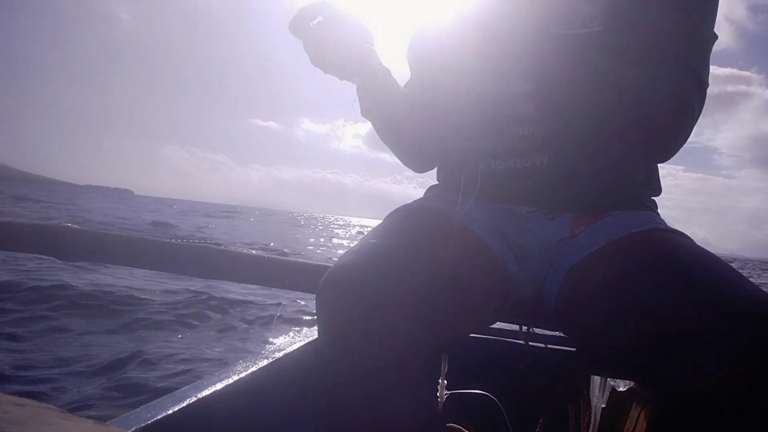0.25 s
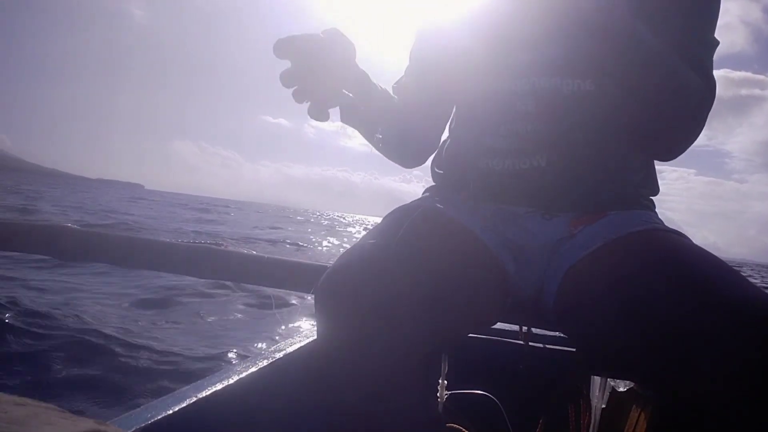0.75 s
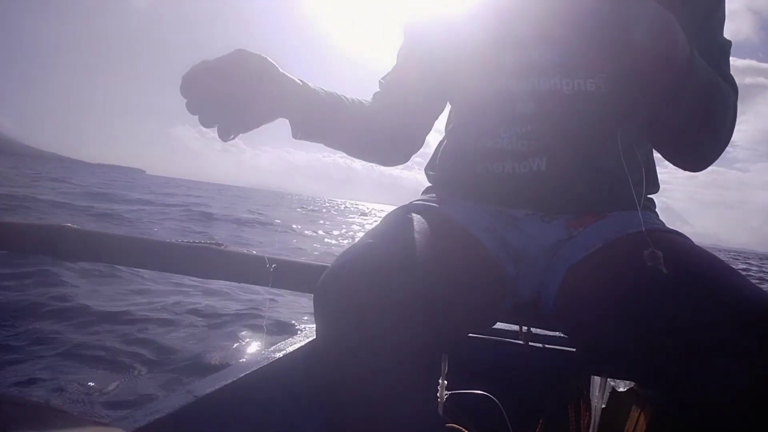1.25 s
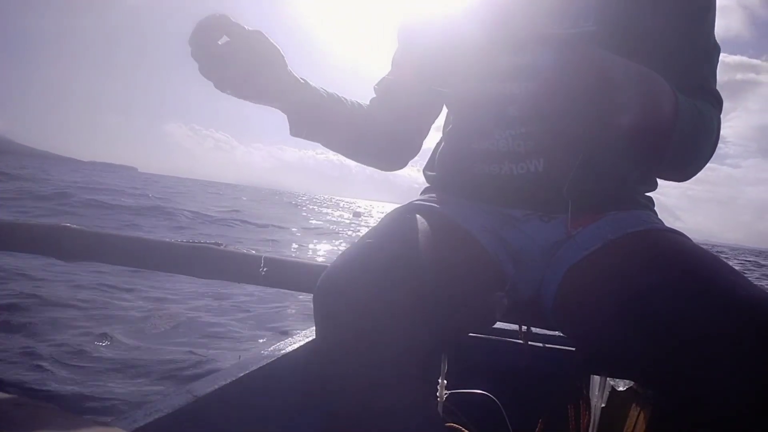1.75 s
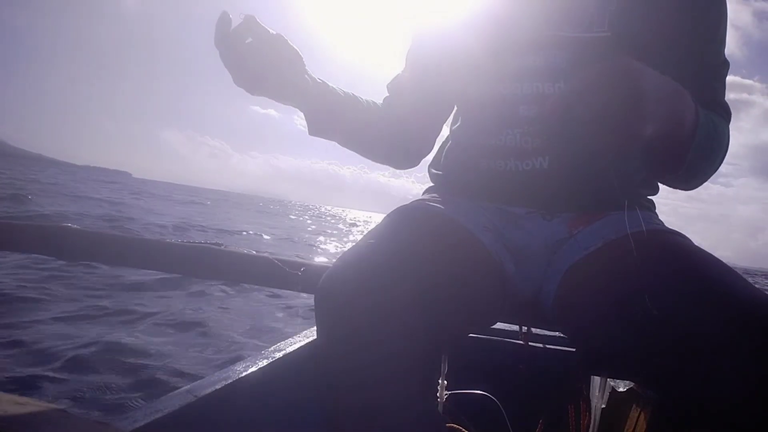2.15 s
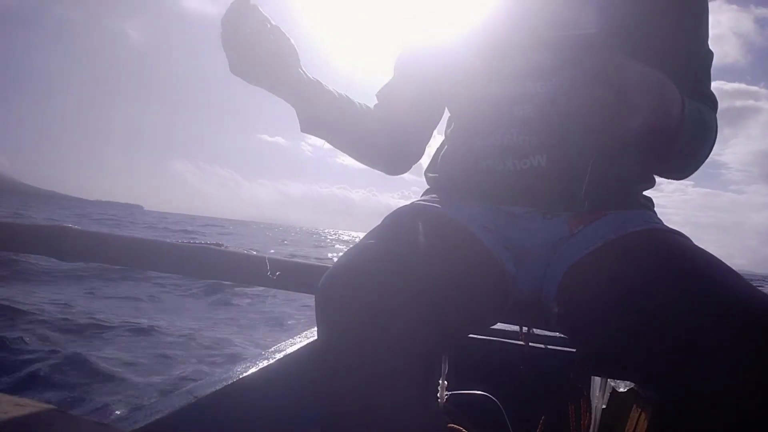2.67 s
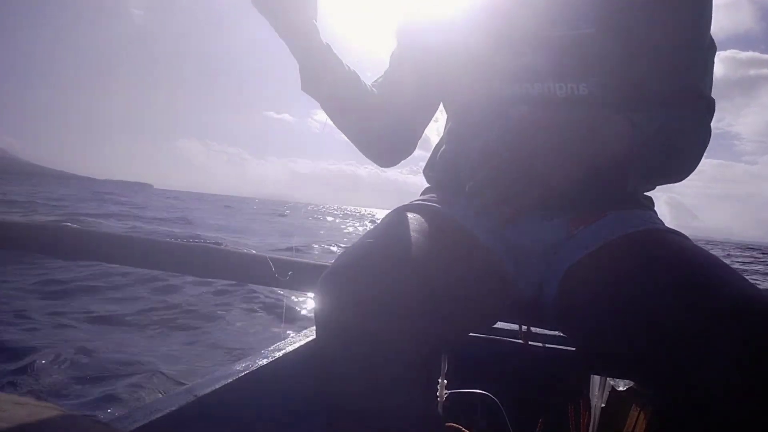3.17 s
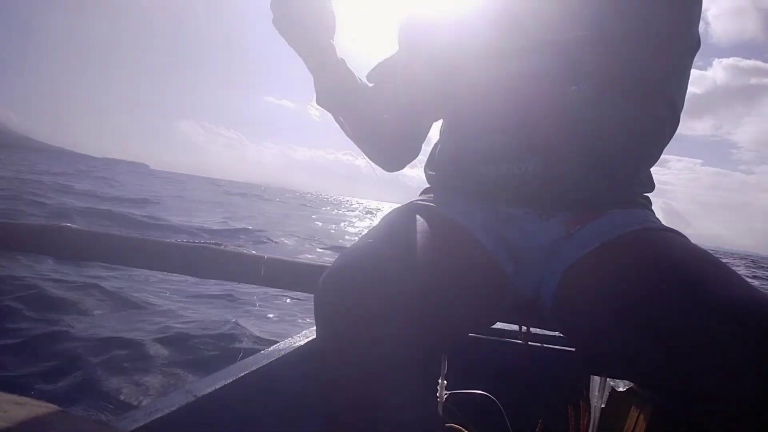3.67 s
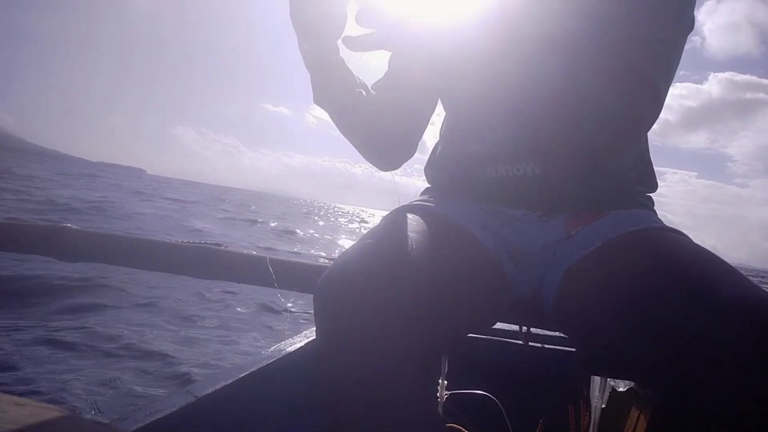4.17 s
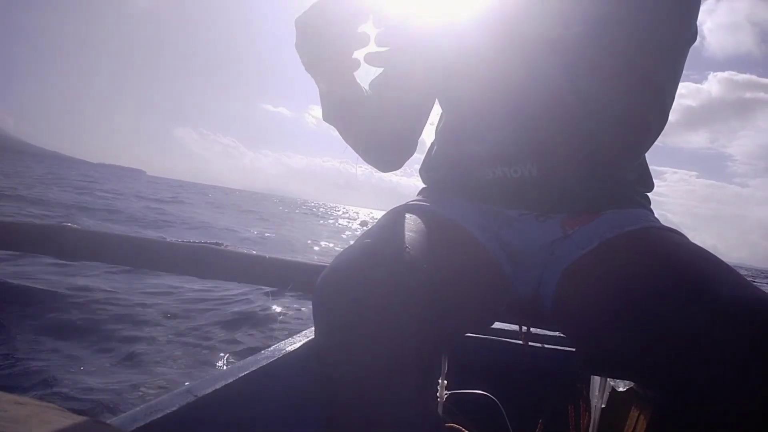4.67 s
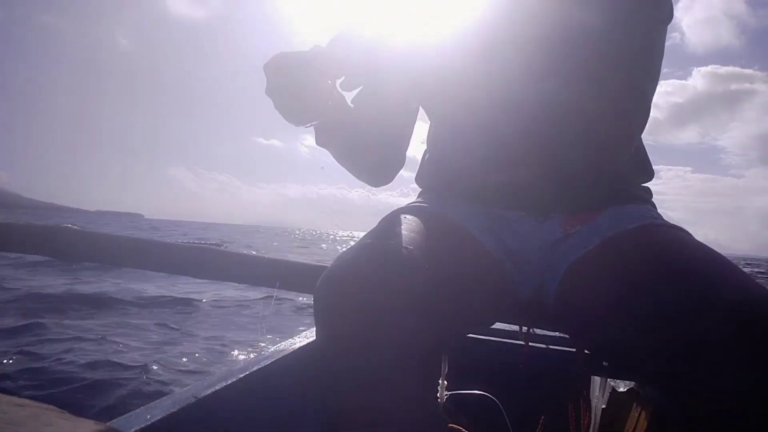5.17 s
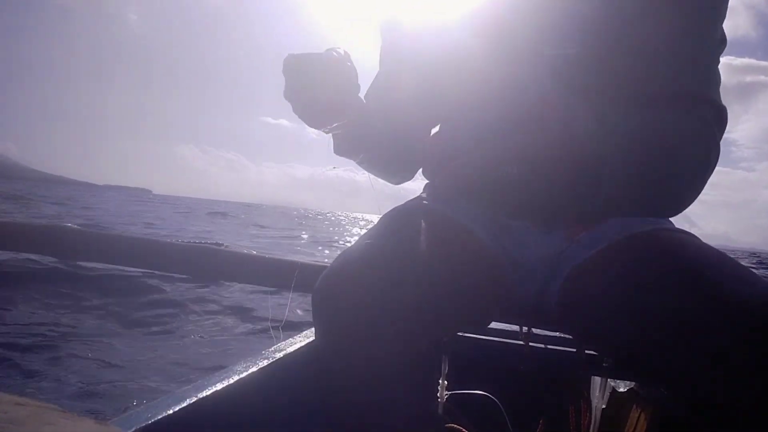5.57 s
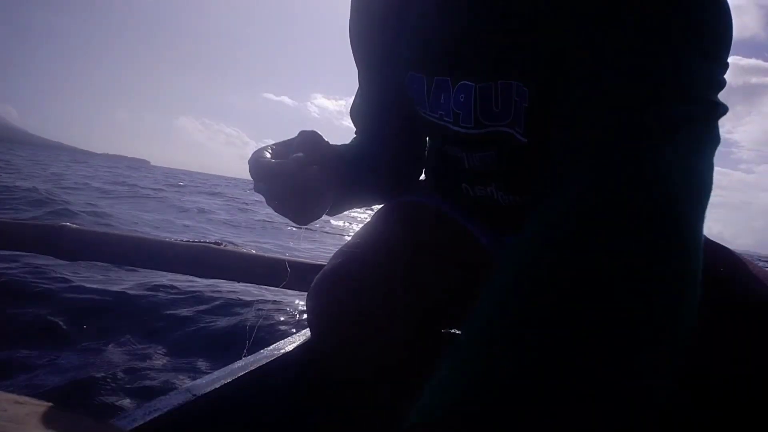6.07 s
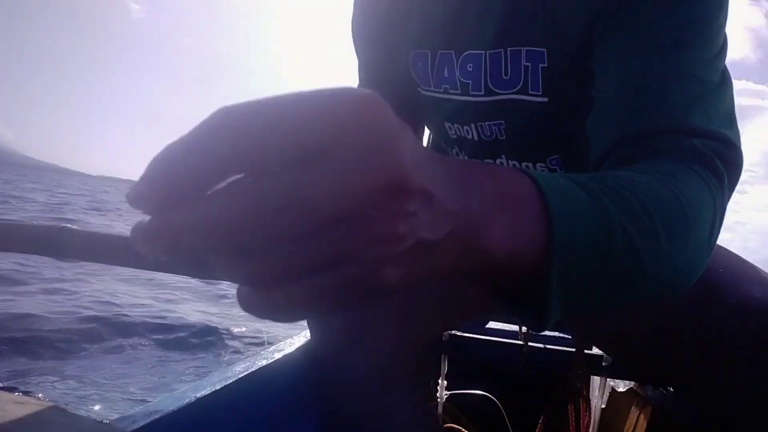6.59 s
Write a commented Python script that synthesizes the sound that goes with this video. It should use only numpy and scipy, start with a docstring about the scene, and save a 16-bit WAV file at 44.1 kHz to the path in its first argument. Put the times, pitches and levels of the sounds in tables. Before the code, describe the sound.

Small waves lap close by against the wooden hull of an open boat, with short ringing bubbles, gurgles, fizzing foam and crisp ticks of spray. A faint, nearly steady wash of distant sea lies underneath. Wind rumbles and thumps on the microphone right at the start and again around 0.7 to 1.1 seconds, with a light splash at about 0.6. After a smaller gust near 2 seconds, the water gurgles more fully, and droplets spatter from 2.5 to 3.3 seconds, the sharpest just before 3. The strongest low buffet comes at about 3.4 seconds. Things ease around 4 seconds, with a small gulp near 4.4. Bubbly splashing returns around 4.9 and 5.5 seconds, while uneven gusts rumble from 5.1 to 6.3. The wind then drops, and one more lap spatters the hull from 6.6 seconds to the end, just before 7.

```python
"""Waves lapping at an open boat.

Small waves at sea trap bubbles that ring briefly, leave foam bursting on the planks and throw droplets
that tick on the hull. Gusts rumble across a small microphone, whose ports ring in the treble.
The far sea is a faint, near-steady noise."""
import sys
import numpy as np
from scipy import signal
from scipy.fft import rfft, irfft, next_fast_len
from scipy.io import wavfile
from scipy.ndimage import uniform_filter1d

SR = 44100
rng = np.random.default_rng(int(sys.argv[2]) if len(sys.argv) > 2 else 0)


def file_out(sig):
    """Save sig as 16-bit WAV at sys.argv[1]."""
    # one column per channel
    cols = np.atleast_2d(sig).T
    # limit, then scale
    lim = np.clip(cols, -1, 1)
    pcm = np.round(lim * 32767).astype(np.int16)
    wavfile.write(sys.argv[1], SR, pcm)


N = 301203

# lap envelopes: t/s, gurgle level/dB, froth level/dB, spray level/dB
LAPS = [(0.0, -61, -63, -61.5), (0.27, -68, -69, -71), (0.49, -71.5, -71, -66.5), (0.89, -71.5, -72, -71.5),
        (1.08, -65, -65, -65), (1.18, -63.5, -65.5, -64.5), (1.31, -67, -74.5, -71), (1.54, -87, -74, -74),
        (1.69, -68.5, -70.5, -70), (1.94, -76, -68, -72.5), (2.19, -56.5, -66.5, -66.5),
        (2.34, -50, -60, -59.5), (2.49, -62, -60, -60.5), (2.7, -73, -70, -64.5), (2.91, -77, -69.5, -63.5),
        (3.06, -57.5, -67.5, -57), (3.23, -80, -69.5, -63), (3.44, -69, -69, -67.5),
        (3.58, -60.5, -66, -66.5), (3.82, -68, -72, -71), (4.28, -64, -66, -67.5),
        (4.73, -66.5, -68.5, -72.5), (4.89, -68, -67, -71), (5.0, -54.5, -64.5, -63),
        (5.19, -65.5, -69, -71.5), (5.44, -68, -70, -68.5), (5.59, -63.5, -68.5, -64.5),
        (5.84, -68.5, -70, -70), (6.11, -61, -67, -72.5), (6.31, -60.5, -65, -69), (6.6, -57.5, -62, -65),
        (6.83, -56, -60, -60)]
# loud bubbles: t/s, level/dB, f/Hz
LOUD_BUBBLES = [(.005, -52.5, 877), (.133, -52, 3450), (.16, -52.5, 2790), (.162, -53.5, 956),
                (.179, -45, 1970), (.237, -51.5, 2790), (.242, -53.5, 2040), (.472, -55.5, 3270),
                (.612, -46, 3920), (.616, -43.5, 1500), (.624, -41.5, 1168), (.625, -43.5, 2800),
                (.856, -49.5, 3420), (.937, -51.5, 2210), (1.056, -51, 2090), (1.076, -52, 890),
                (1.081, -47.5, 2120), (1.201, -48.5, 1676), (1.266, -55, 824), (1.286, -48.5, 2350),
                (1.287, -51.5, 3960), (1.336, -53, 1610), (1.504, -50.5, 1320), (1.54, -51.5, 1860),
                (1.833, -56, 2070), (1.891, -52, 2000), (1.96, -51, 2340), (1.961, -45, 1253),
                (2.139, -51.5, 1420), (2.193, -45.5, 1044), (2.194, -48, 747), (2.215, -46, 2640),
                (2.224, -46.5, 1270), (2.228, -44.5, 780), (2.25, -41.5, 3500), (2.252, -43, 716),
                (2.276, -49, 2720), (2.28, -51, 1142), (2.285, -47, 1610), (2.303, -53, 1653),
                (2.344, -51, 1620), (2.446, -52, 2420), (2.485, -51, 740), (2.552, -49, 4500),
                (2.603, -52, 2450), (2.646, -51.5, 3110), (2.651, -51, 2330), (2.711, -51, 1040),
                (2.869, -44, 2880), (2.873, -41, 1650), (2.901, -51, 1170), (2.927, -51.5, 693),
                (2.929, -41, 2670), (2.931, -51, 1710), (2.953, -53, 1334), (2.976, -46, 2920),
                (3.006, -51, 3160), (3.079, -50.5, 1790), (3.118, -41, 1730), (3.119, -48, 1170),
                (3.123, -47.5, 3320), (3.195, -50.5, 1590), (3.468, -46.5, 2440), (3.498, -47.5, 1940),
                (3.554, -43.5, 2240), (3.633, -47.5, 1570), (3.648, -51, 3940), (3.649, -43, 742),
                (3.674, -46.5, 1530), (3.676, -44, 895), (4.04, -57, 1900), (4.089, -55, 1990),
                (4.105, -48, 2480), (4.131, -55, 3000), (4.425, -48.5, 2060), (4.444, -47, 2990),
                (4.483, -50, 1730), (4.491, -50.5, 1077), (4.776, -51.5, 1010), (4.827, -47, 2100),
                (4.862, -39, 3480), (4.863, -43, 2300), (4.876, -43, 1007), (4.921, -47, 766),
                (4.923, -44.5, 986), (5.043, -40, 1190), (5.05, -45.5, 1690), (5.088, -42, 2170),
                (5.105, -41, 1504), (5.21, -53.5, 1970), (5.33, -60, 1500), (5.427, -41.5, 1650),
                (5.454, -45.5, 3000), (5.491, -40.5, 1920), (5.492, -47, 695), (5.492, -39, 2600),
                (5.493, -46, 1080), (5.504, -46, 734), (5.625, -51, 2670), (5.683, -49.5, 2980),
                (5.746, -44.5, 1915), (5.976, -53, 2360), (6.133, -48, 1070), (6.135, -41.5, 639),
                (6.137, -51, 820), (6.396, -50, 2310), (6.439, -47, 1530), (6.476, -47.5, 830),
                (6.586, -46, 3610), (6.591, -43, 896), (6.611, -43, 1430), (6.696, -45, 1150),
                (6.733, -50, 2600)]
# closing or opening cavities: t/s, length/s, start f/Hz, end f/Hz, level/dB
CAVITIES = [(4.382, .052, 290, 1000, -53), (4.312, .028, 850, 1550, -60), (.152, .025, 3200, 1900, -48)]
# loud droplets: t/s, level/dB, middle band re top band/dB, crack re level/dB
LOUD_DROPLETS = [(.0327, -45, -4, -21), (.0456, -39, -17, -12), (.139, -33, -4, -10), (.1544, -39, -19, -8),
                 (.1716, -32, -9, -10), (.1924, -39.5, 8, 3), (.2095, -32.5, -0.5, 0),
                 (.4716, -34, -11, -35), (.499, -35, -9, -20), (.608, -36, -5, -25), (.6172, -27, -7, -17),
                 (.6254, -42, -10, 7), (.8574, -33, -9, -23), (.9505, -37, -21, 3), (1.0115, -40, 0, 8),
                 (1.079, -34.5, 25, 1), (1.1253, -28, -21, -29), (1.2155, -40, -28, -27),
                 (1.2971, -38, 22, -2), (1.4615, -40.5, 0, -8), (1.5937, -39, -5, 0),
                 (1.6376, -28, -12.5, -6.5), (1.8084, -51, -9, -8), (1.8413, -39, -5.5, -17),
                 (1.9559, -49, 5, 10), (2.0003, -37, -16, -12), (2.2941, -33, -8, -12),
                 (2.3336, -36.5, 17, -0.5), (2.4661, -38.5, 0, -1), (2.4785, -36, -17, -11),
                 (2.5639, -27, -22, -23), (2.631, -27.5, -3, -1), (2.6411, -24, -7, -5.5),
                 (2.652, -38, 9, -9), (2.661, -33, -14, -14), (2.7189, -34, -10, 1),
                 (2.8702, -23.5, -6, -6), (2.9027, -26.5, -8.5, -9.5), (2.926, -50, -10, 2),
                 (2.9338, -12, -23, -13.5), (2.975, -29.5, -12, -3), (2.981, -34, 12, -7),
                 (3.0072, -36, -5, -3), (3.059, -27, -21, -4), (3.076, -40, 2, -23), (3.08, -31.5, 0, 5.5),
                 (3.0896, -31, 18, 11.5), (3.1093, -30.5, -2.5, -10), (3.1196, -29, -5, -10),
                 (3.1352, -34, -10, -9), (3.1616, -40, 5, -28), (3.2042, -37, -2, -23),
                 (3.2645, -26.5, -9.5, -9), (3.3533, -38, -7, -11), (3.457, -39, -21, 2),
                 (3.4621, -37, -3, -1), (3.4703, -34, 15, 2), (3.4917, -32.5, 1, -1),
                 (3.509, -21, -24, -11), (3.519, -39, 6, -20), (3.6621, -34, 1.5, 5.5), (3.696, -39, -2, 2),
                 (3.7142, -37, -2.5, -1), (4.0826, -47, -16, 10), (4.3353, -42.5, 7, -5),
                 (4.5431, -38, -25, -12), (4.8316, -41, -8, -15), (4.8537, -22, -14, -32),
                 (4.8686, -30, 12, -10), (4.878, -34, -8.5, -15), (4.905, -31, -10, -29),
                 (4.9182, -33, -7, -12), (4.9295, -31, -16, -20), (4.9667, -29.5, -9.5, -27),
                 (5.0537, -27.5, -29, -7), (5.0767, -37, -14, -4), (5.0877, -36, -11, -5),
                 (5.1037, -34, -6, -9), (5.1772, -36.5, -20, -17), (5.4306, -34.5, -0.5, 1.5),
                 (5.4556, -43, 8, 10), (5.4894, -29, -11, -31), (5.5468, -31.5, -3, -7),
                 (5.6639, -38.5, -5, 0), (5.759, -36.5, -2.5, 1.5), (5.77, -33.5, -9, -13),
                 (5.8083, -37, -6.5, -11), (6.2546, -53, -19, -15), (6.359, -40, -3.5, -22),
                 (6.6035, -37, -9, -3), (6.6109, -31, -5, -19), (6.6472, -24, -15, -9),
                 (6.705, -36, -16, -14.5), (6.751, -35.5, -27.5, -23), (6.758, -27.5, -6.5, -11),
                 (6.777, -34, -14.5, -17), (6.789, -22.5, -12, -13), (6.8203, -38.5, -1, -3)]
# wind rumble envelope: t/s, level/dB
GUST_LEVELS = [(0.0, -64), (0.07, -51), (0.13, -28), (0.32, -33.5), (0.36, -44), (0.55, -57), (0.74, -34),
               (0.78, -45), (0.86, -31), (0.91, -37), (0.97, -43.5), (1.1, -30.5), (1.16, -50),
               (1.75, -55.5), (1.86, -34), (1.96, -56), (2.02, -38.5), (2.19, -32), (2.43, -64),
               (2.53, -44.5), (2.97, -62), (3.01, -37.5), (3.16, -42.5), (3.46, -25.5), (3.5, -30.5),
               (3.69, -36), (3.75, -38), (3.8, -33.5), (3.99, -54), (4.45, -52), (4.51, -34), (4.57, -43),
               (4.75, -47), (4.77, -45.5), (4.94, -38.5), (5.0, -55), (5.12, -28), (5.16, -48),
               (5.21, -34.5), (5.31, -38), (5.34, -32), (5.5, -32.5), (5.52, -25.5), (5.55, -35),
               (5.69, -38), (5.73, -51), (5.78, -29), (5.82, -31), (5.84, -40), (6.16, -32), (6.22, -29.5),
               (6.39, -53), (6.62, -52), (6.83, -54)]
# single eddies: t/s, level/dB, f/Hz, flutter level/dB
EDDIES = [(0.127, -23.5, 121.4, -32), (0.218, -25.5, 75.4, -37.5), (0.238, -25.5, 200, -44),
          (0.248, -27, 113, -33.5), (0.307, -33, 72.5, -49), (0.718, -30, 78, -33), (0.795, -32, 74, -34.5),
          (0.85, -26.5, 152, -35), (1.03, -30, 74.6, -67), (1.089, -25.5, 116, -42), (2.105, -29, 77, -59),
          (3.283, -29.5, 75.6, -45), (3.35, -27, 108, -37.5), (3.403, -18, 77, -39),
          (3.439, -24.5, 114, -32.5), (3.492, -30, 96, -34), (3.549, -25, 84, -40), (3.636, -45, 99, -37),
          (3.804, -34, 99, -44), (4.49, -27, 78, -63), (5.09, -29, 87, -52), (5.198, -56, 150, -38),
          (5.438, -25.5, 104, -60), (5.512, -23.5, 78, -60), (5.57, -29.5, 108, -60), (5.611, -28, 80, -49),
          (5.745, -31.5, 82, -64), (5.861, -36, 128, -65), (6.063, -32, 139, -43), (6.117, -29, 75.4, -46),
          (6.207, -22.5, 90.6, -26.5), (6.212, -25, 191, -56)]
# wind rumble spectrum: f/Hz, relative density/dB
RUMBLE_SPECTRUM = [(8.8, 13), (15, -1), (28, 0), (86, -2), (113, -11), (143, -11), (225, -30), (300, -38),
                   (390, -42), (660, -120)]
# wind flutter spectrum: f/Hz, relative density/dB
FLUTTER_SPECTRUM = [(71, -1), (120, 5.5), (228, -6), (402, -21.5), (433, -26.5), (650, -48), (700, -63),
                    (910, -74), (1540, -120)]
# far sea spectrum: f/Hz, relative density/dB
SEA_SPECTRUM = [(35, -2), (60, -2.5), (168, 7), (256, -3), (490, -7), (650, -19), (1300, -19.5),
                (2600, -23.5), (3600, -41), (5300, -67), (6600, -47), (8320, -30), (11000, -52),
                (14900, -20.5), (16000, -39)]
# microphone port resonances: f/Hz, width/Hz, gain/dB
PORT_MODES = [(8250, 850, 7.5), (14700, 650, 11), (12500, 610, 8)]


def bubbles(rows):
    """Trapped air rings as a dying, gliding sine; the torn surface adds a noisy slap."""
    ring_at_1khz_s, ring_exponent = 0.013, -0.79
    out = np.zeros(N)
    white = rng.standard_normal(N)
    for (s, db, hz), (ring_draw, glide_draw) in zip(rows, rng.standard_normal((len(rows), 2))):
        ring_s = ring_at_1khz_s * (hz / 1000) ** ring_exponent * np.exp(.15 * ring_draw)
        glide_octaves = -.06 + .11 * glide_draw  # per ring time
        noise = white[int(s * SR):][:int(4 * ring_s * SR)]
        age = np.arange(len(noise)) / SR / ring_s
        phase = 2 * np.pi * np.cumsum(hz * 2 ** (glide_octaves * np.minimum(age, 1.5))) / SR
        envelope = (1 - np.exp(-6 * age)) * np.exp(-age)
        slap = rms_one(band(noise, 0.46 * hz, 1.233 * hz))
        raggedness = .4 + hz / 5500  # small bubbles burst more raggedly
        add(out, s, amp(db) * envelope * (1.5 * np.sin(phase) + raggedness * slap))
    return out


def faint_bubbles(froth_db, count=170):
    """Random bubble rows, denser in the laps."""
    when, size, pitch = rng.random((count, 3)).T
    db = -58 + 5 * (size - .5)
    hz = 1100 * 3.9 ** pitch ** .7
    return list(zip(crowded_times(froth_db, 1.2, when), db, hz))


def gulps():
    """A cavity sweeps in pitch as it closes or opens."""
    out = np.zeros(N)
    for s, length_s, start_hz, end_hz, db in CAVITIES:
        progress = np.linspace(0, 1, int(length_s * SR))
        phase = 2 * np.pi * np.cumsum(start_hz * (end_hz / start_hz) ** progress) / SR
        add(out, s, amp(db) * np.sqrt(np.sin(np.pi * progress) + 1e-9) * np.sin(phase))
    return out


def droplets(rows):
    """Impacts on the wooden hull: a snap and a spattering tail, in three bands."""
    snap_s, fizz_s = 0.00017, 0.013
    top, middle, crack = np.zeros((3, N))
    t = np.arange(1400) / SR
    noises = rng.standard_normal((len(rows), len(t))) * (t > 0)
    spatters = np.repeat(amp(3 * rng.standard_normal((len(rows), 28))), 50, axis=1)
    for (s, db, middle_db, crack_db), noise, spatter in zip(rows, noises, spatters):
        fizz_db = -20.5 - .45 * (db + 40)  # strong drops fizz relatively less
        tail = amp(fizz_db) * spatter * np.exp(-t / fizz_s)
        burst = 1.86 * (t == 0) + noise * (np.exp(-t / snap_s) + tail)
        add(top, s, amp(db - max(middle_db, 0)) * burst)
        add(middle, s, amp(db + min(middle_db, 0)) * burst)
        add(crack, s, amp(db + crack_db) * burst)
    top = signal.sosfilt(signal.butter(2, 11000, "high", fs=SR, output="sos"), top)
    return amp(2) * top + amp(5) * band(middle, 5650, 12600) + amp(3) * band(crack, 2800, 6500)


def faint_droplets(spray_db, count=120):
    """Random droplet rows, denser in the spray."""
    when, size, middle, crack = rng.random((count, 4)).T
    db = -52.5 + 6 * (size - .5)
    return list(zip(crowded_times(spray_db, 0.82, when), db, -24 + 36 * middle, -26 + 22 * crack))


def gurgle(level_db):
    """Clumps of small bubbles, each ringing at its own pitch, over a patchy wash."""
    clicks = grains(per_s=400 * amp(3.7 * drift(14)), spread_db=1.5)
    pitch_index = rng.integers(0, 24, N)
    rings, wash = np.zeros((2, N))
    for k, hz in enumerate(np.geomspace(600, 3300, 24)):
        ring = resonance(clicks * (pitch_index == k) + 1e-18, hz, 0.071 * hz)
        rings += resonance(ring, hz, 0.51 * hz) * (hz / 1000) ** -.9  # second pass softens the onset
    white = rng.standard_normal(N)
    edges_hz = np.geomspace(550, 4500, 7)
    for low_hz, high_hz in zip(edges_hz, edges_hz[1:]):
        wash += band(white, low_hz, high_hz) * amp(4.5 * drift(7.7)) * (low_hz / 1000) ** -.7
    return amp(level_db) * (amp(-1) * rms_one(rings) + amp(-10) * rms_one(wash))


def froth(level_db):
    """Foam bursts on the planks: dense clumps of tiny bubbles, a few cycles each."""
    clicks = grains(per_s=2500 * amp(3.4 * drift(28)), spread_db=5.5)
    pitch_index = rng.integers(0, 12, N)
    pops = np.zeros(N)
    for k, hz in enumerate(np.geomspace(1700, 4600, 12)):
        pops += resonance(clicks * (pitch_index == k) + 1e-18, hz, 0.14 * hz) * (hz / 2000) ** -1.1
    return amp(level_db - 3.5) * rms_one(band(pops, 1380, 4300))


def spray(level_db):
    """Fine droplets of four sizes, each crackling in its own band, clumped over hiss."""
    bands = [(3960, 5000, 0), (5900, 6200, 6), (9300, 35000, 9), (5100, 22000, 1)]
    clumps_db = 5.9 * drift(38)
    clicks = grains(per_s=700 * amp(clumps_db), spread_db=3.5)
    size_index = rng.integers(0, 4, N)
    crackle = np.zeros(N)
    for k, (low_hz, high_hz, db) in enumerate(bands):
        crackle += amp(db) * band(clicks * (size_index == k) + 1e-18, low_hz, high_hz)
    hiss = band(rng.standard_normal(N), 4100, 14000) * amp(clumps_db)
    return amp(level_db) * (amp(-4.5) * rms_one(crackle) + amp(-9) * rms_one(hiss))


def wind():
    """Lumpy turbulence on the membrane; single eddies thump it and shake flutter loose."""
    calm_rumble_db, calm_flutter_db = -51, -57
    shake_lag_s, shake_width_s = .01, .013
    gust_db, = envelopes(GUST_LEVELS)
    lumps_db = 3.5 * drift(16)
    rumble = amp(gust_db + lumps_db) * steadied(coloured(RUMBLE_SPECTRUM), window_s=0.0534)
    # flutter follows only a share of the rumble's swing
    flutter_gain = amp(calm_flutter_db + 0.42 * (gust_db - calm_rumble_db) + 0.79 * lumps_db)
    offset_s = np.arange(-2000, 2000) / SR
    shake = np.exp(-(offset_s / shake_width_s) ** 2)
    for s, db, hz, shake_db in EDDIES:
        cycles = np.arange(int(3 * SR / hz)) * hz / SR
        envelope = 3.47 * cycles * np.exp(-1.6 * cycles)
        add(rumble, s, -amp(db) * envelope * np.sin(2 * np.pi * cycles))
        add(flutter_gain, s + shake_lag_s + offset_s[0], amp(shake_db) * shake)
    return rumble + flutter_gain * steadied(coloured(FLUTTER_SPECTRUM), window_s=0.0297)


def far_sea(level_db=-56):
    """Distant water: faint noise, wavering slightly."""
    return amp(level_db + 0.48 * drift(3.5)) * coloured(SEA_SPECTRUM)


def microphone_ports(x):
    """Port resonances lift narrow treble bands."""
    return x + sum((amp(db) - 1) * resonance(x, hz, width_hz) for hz, width_hz, db in PORT_MODES)


def amp(db):
    """dB to gain."""
    return 10 ** (np.asarray(db) / 20)


def rms_one(x):
    """Scale to rms 1."""
    return x / np.sqrt(np.mean(x ** 2) + 1e-20)


def envelopes(rows):
    """Level columns interpolated to every sample."""
    s, *columns = np.transpose(rows)
    return [np.interp(np.arange(N) / SR, s, column) for column in columns]


def drift(corner_hz):
    """Slow noise, rms about 1: two one-pole low-passes at SR / 20."""
    pole = np.exp(-40 * np.pi * corner_hz / SR)
    white = rng.standard_normal(N // 20 + 2002)
    slow = signal.lfilter([1], [1, -2 * pole, pole * pole], white)[2000:]
    return np.interp(np.arange(N) / 20, np.arange(len(slow)), rms_one(slow))


def coloured(spectrum):
    """Noise of the given spectrum, rms 1."""
    size = next_fast_len(N)
    hz, db = np.transpose(spectrum)
    grid_hz = np.fft.rfftfreq(size, 1 / SR) + 1
    gain = amp(np.interp(np.log(grid_hz), np.log(hz), db))
    return rms_one(irfft(rfft(rng.standard_normal(size)) * gain, size)[:N])


def steadied(x, window_s):
    """Even out slow level swings."""
    return x / np.sqrt(uniform_filter1d(x ** 2, int(window_s * SR)) + 0.0085)


def band(x, low_hz, high_hz):
    """Band-pass, upper edge capped at 0.45 SR."""
    edges_hz = [low_hz, min(high_hz, .45 * SR)]
    return signal.sosfilt(signal.butter(2, edges_hz, "band", fs=SR, output="sos"), x)


def resonance(x, hz, width_hz):
    """Two-pole resonator, peak gain 1."""
    r = np.exp(-np.pi * width_hz / SR)
    feedback = [1, -2 * r * np.cos(2 * np.pi * hz / SR), r * r]
    return signal.lfilter(np.array([1, 0, -1]) * (1 - r * r) / 2, feedback, x)


def grains(per_s, spread_db):
    """Random clicks, a few larger than the rest."""
    sizes = amp(spread_db * np.minimum(rng.exponential(1, N), 4)) * rng.choice([-1, 1], N)
    return sizes * (rng.random(N) < per_s / SR) + 1e-18


def crowded_times(level_db, exponent, draws):
    """Uniform draws to t/s, crowding where the level is high."""
    cumulative = np.cumsum(amp(exponent * (level_db - level_db.mean())))
    return np.interp(draws, cumulative / cumulative[-1], np.arange(N) / SR)


def add(out, s, sound):
    """Mix a sound in at time s."""
    start = int(s * SR)
    out[start:start + len(sound)] += sound[:max(N - start, 0)]


def scene():
    """Water through the microphone ports, plus far sea and wind; mono."""
    gurgle_db, froth_db, spray_db = envelopes(LAPS)
    water = gurgle(gurgle_db) + froth(froth_db)
    bubble_rows = LOUD_BUBBLES + faint_bubbles(froth_db)
    roughness = amp(3 * drift(290))  # torn surface
    water += roughness * (bubbles(bubble_rows) + gulps())
    water += spray(spray_db) + droplets(LOUD_DROPLETS + faint_droplets(spray_db))
    return (microphone_ports(water) + far_sea() + wind())[None]


def record(dry):
    """Block the deepest pressure swings; step the treble down above the ports, then cut it."""
    high_pass_hz, step_hz, step_db, cutoff_hz = 12, 15450, -17, 16600
    x = signal.sosfilt(signal.butter(1, high_pass_hz, "high", fs=SR, output="sos"), dry)
    below_step = signal.sosfiltfilt(signal.ellip(10, .2, 30, step_hz, fs=SR, output="sos"), x)
    stepped = below_step + amp(step_db) * (x - below_step)
    return signal.sosfilt(signal.ellip(10, .2, 60, cutoff_hz, fs=SR, output="sos"), stepped)


dry = scene()
out = record(dry)
file_out(out)
```